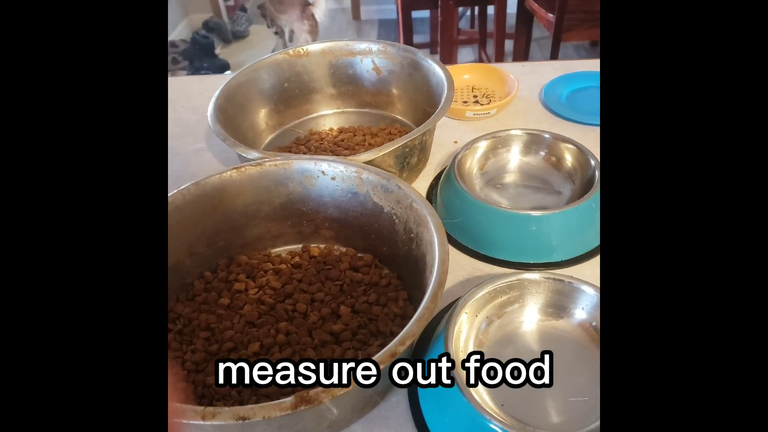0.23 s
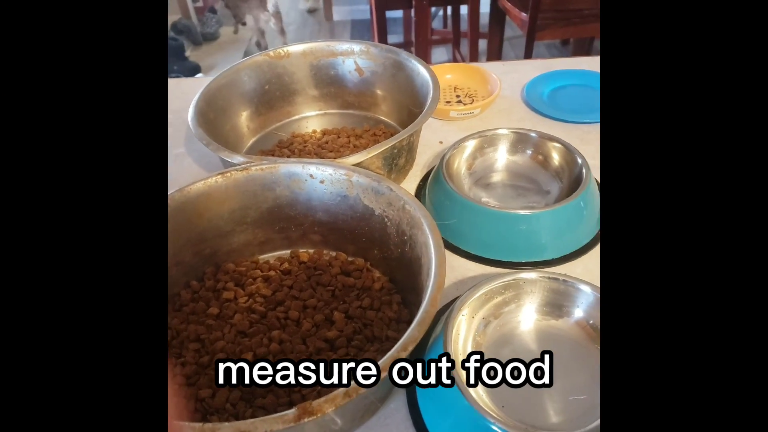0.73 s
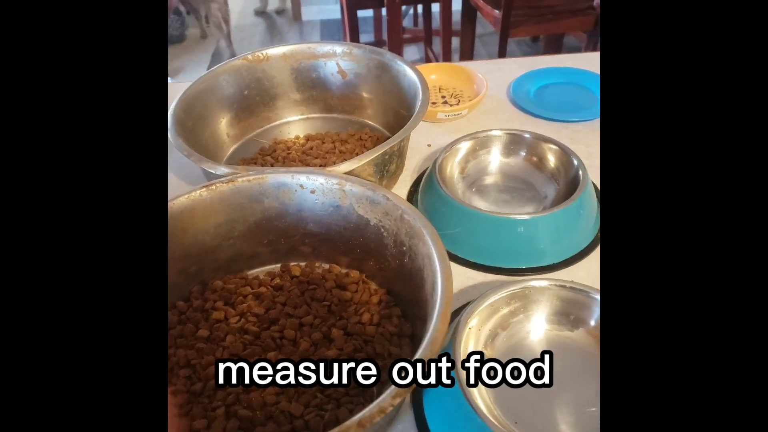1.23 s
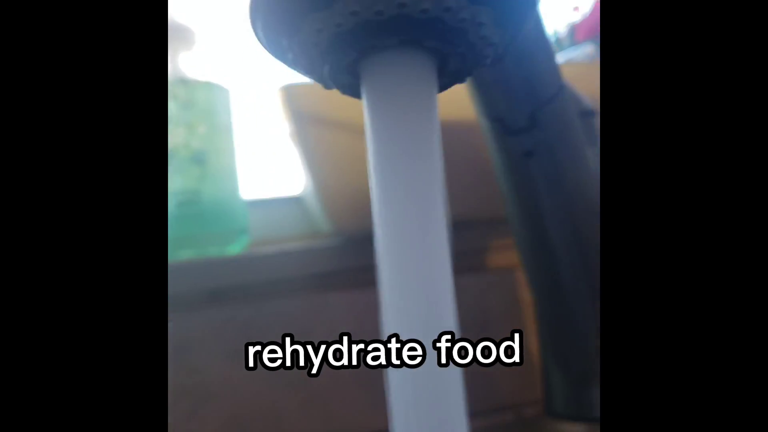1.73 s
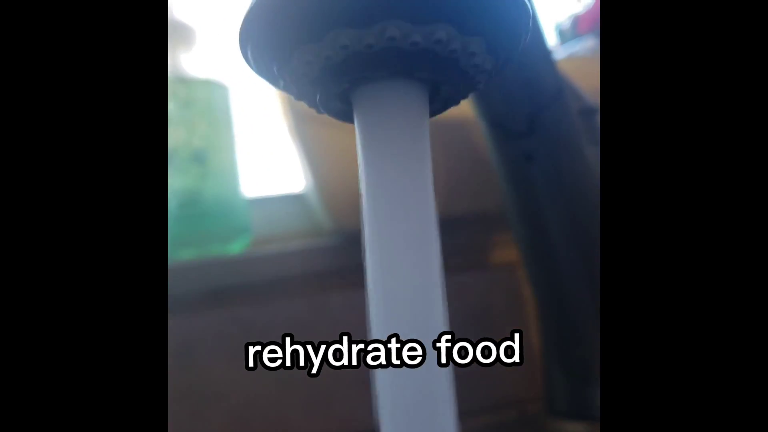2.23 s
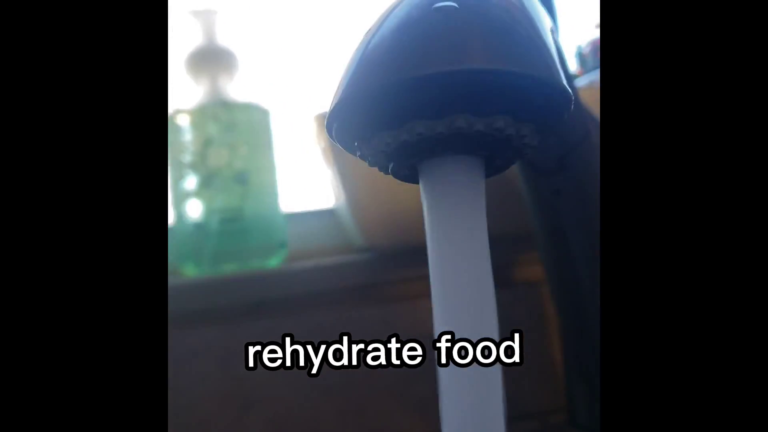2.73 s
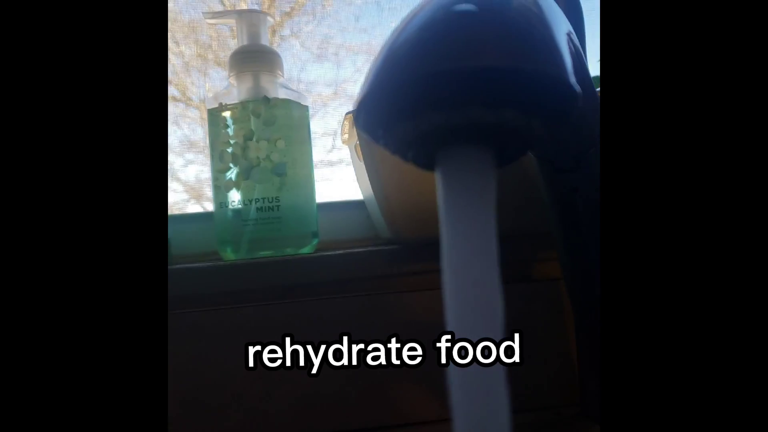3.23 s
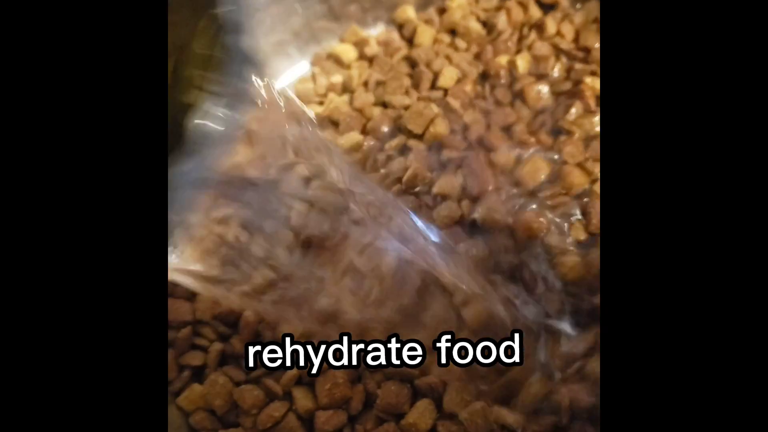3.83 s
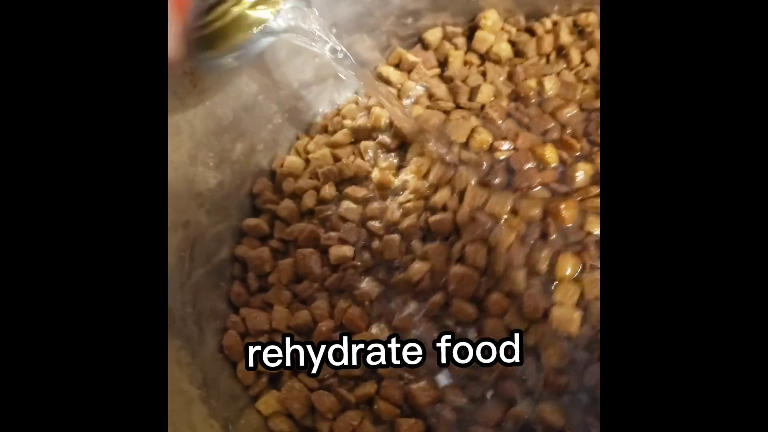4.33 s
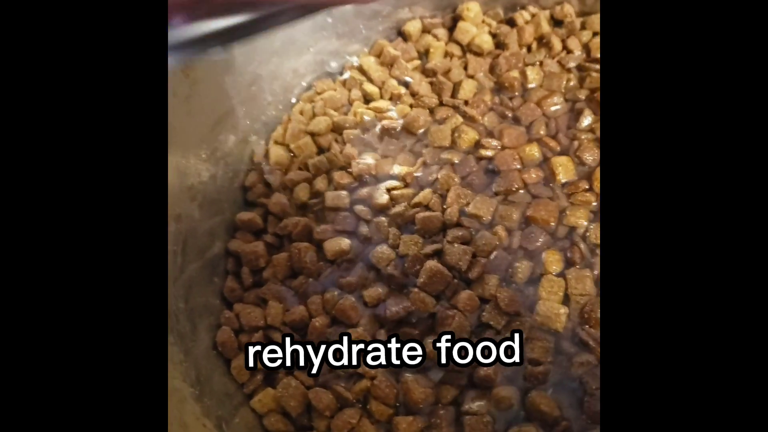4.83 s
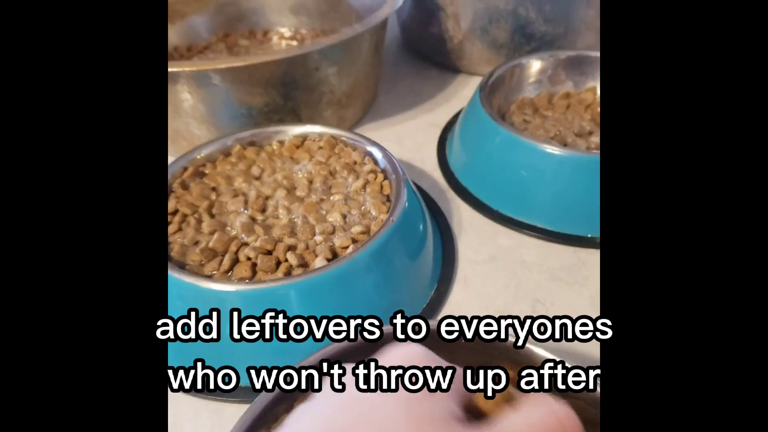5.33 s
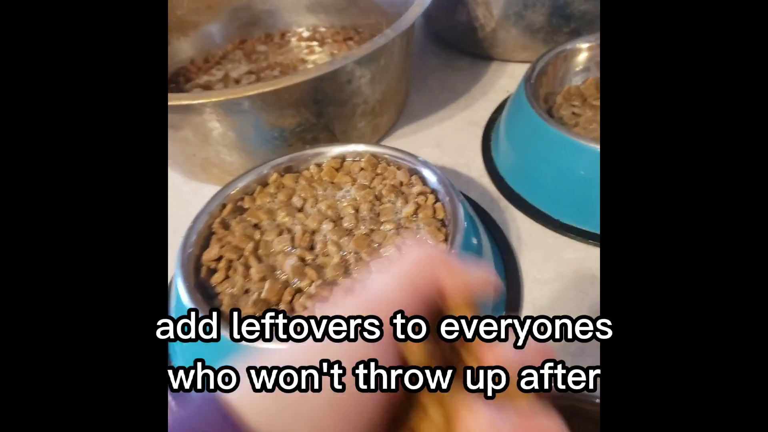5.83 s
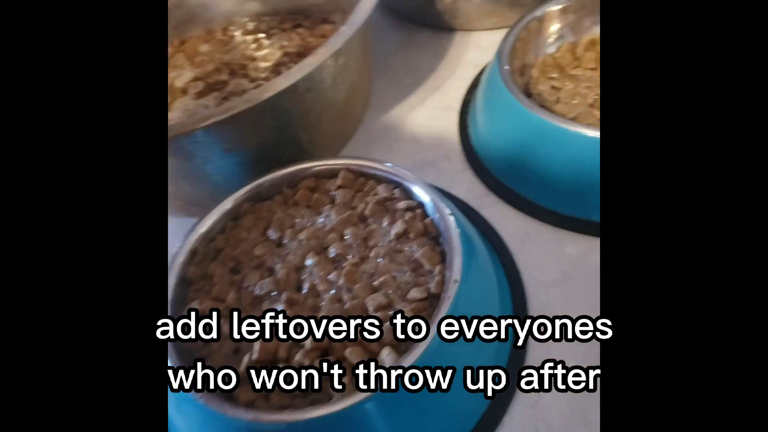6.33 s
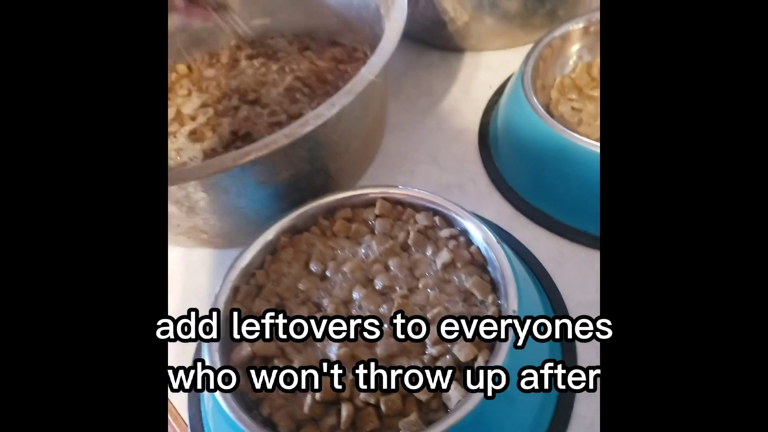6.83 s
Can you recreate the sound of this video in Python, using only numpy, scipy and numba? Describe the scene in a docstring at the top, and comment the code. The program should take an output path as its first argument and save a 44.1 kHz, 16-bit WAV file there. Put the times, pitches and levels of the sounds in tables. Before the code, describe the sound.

Dry kibble rustles, a kitchen tap thuds on and hisses, water splashes onto the food, then handfuls clatter into a steel bowl.

```python
"""A kitchen tap at feeding time, close up over humming motors, in four passages split by silence.
Dry kibble creeps in a steel pot. The tap opens: its pipe thuds, trapped air spits, and the aerated jet
hisses and drums into the sink. Water splashes onto the kibble in crackles and bubbles while the tap
runs on behind. Last, steel clinks on a rim, hard pieces drop into a bowl and a hand scoops the food."""
import sys
import numpy as np
from scipy import signal
from scipy.fft import rfft, irfft, next_fast_len
from scipy.io import wavfile
from numba import njit

SR = 44100
rng = np.random.default_rng(int(sys.argv[2]) if len(sys.argv) > 2 else 0)


def pcm_store(signal):
    """Save signal as 16-bit PCM."""
    levels = np.round(np.clip(np.atleast_2d(signal), -1, 1) * 32767)
    wavfile.write(sys.argv[1], SR, levels.astype(np.int16).T)


N = 313110

# the four audible passages: (start [s], end [s])
PASSAGES = [(0, 1.238), (1.366, 3.458), (3.580, 5.170), (5.276, 7.2)]
DRY_POT, TAP_ON, SOAKING, SERVING = PASSAGES
# stereo width, narrow in the bass and open on top: (frequency [Hz], side minus mid [dB])
STEREO_WIDTH = [(60, -24.5), (120, -20.5), (200, -15), (380, -6.5), (700, -3.5), (1300, -1.5), (2400, -0.5),
                (15000, 0)]


def undb(db):
    """Decibels to gain."""
    return np.exp(np.asarray(db) * (np.log(10) / 20))


def clock():
    """Time of every sample in seconds."""
    return np.arange(N) / SR


def swell(s, rise, hold, decay):
    """Envelope that grows to one at time s, holds and dies away; rise and decay are time constants."""
    t = clock()
    fade = np.maximum(s - t, 0) / rise + np.maximum(t - s - hold, 0) / decay
    return np.exp(-np.minimum(fade, 20))


def during(start, end, rise=0.00055, fall=0.0063):
    """Gate that ramps open from start and ramps shut from end."""
    return np.clip((clock() - start) / rise, 0, 1) * np.clip((end - clock()) / fall + 1, 0, 1)


def colour(x, points, share=1):
    """EQ through (Hz, dB) points; share scales the curve's dB."""
    hz, db = np.transpose(points)
    size = next_fast_len(x.shape[-1] + 2048, real=True)
    f = np.maximum(np.fft.rfftfreq(size, 1 / SR), 1)
    gain = undb(share * np.interp(np.log(f), np.log(hz), db))
    return irfft(rfft(x, size) * gain, size)[..., :x.shape[-1]]


def lean(x, points, left=0.57, right=0.46):
    """Pan by frequency: the left takes a share of an EQ curve, the right a share of its inverse."""
    return np.array([colour(x[0], points, left), colour(x[1], points, -right)])


def band(x, lo_hz, hi_hz):
    """Causal band-pass."""
    sos = signal.butter(2, [lo_hz, min(hi_hz, SR / 2 - 1)], "band", fs=SR, output="sos")
    return signal.sosfilt(sos, x)


def unit(x):
    """Scale a stereo sound so that its centre has rms 1."""
    return x / np.sqrt(np.mean(x.mean(0) ** 2))


def widen(pair):
    """Mid and side become left and right: alike in the bass, unlike in the treble."""
    return pair[0] + colour(pair[1], STEREO_WIDTH) * np.array([[1], [-1]])


def stereo_noise():
    """Broadband noise that widens towards the treble."""
    return widen(rng.standard_normal((2, N)))


def pan(db):
    """Channel gains that put the left db above the right."""
    return undb(np.array([[db], [-db]]) / 2)


def walk(rate):
    """Random drift with a spread near 1, turning rate times a second."""
    knots = np.arange(0, N / SR + 1, 1 / rate)
    return np.interp(clock(), knots, rng.standard_normal(len(knots)))


def add(out, s, sound):
    """Mix a short sound in at time s."""
    i = max(int(s * SR), 0)
    out[:, i:i + sound.shape[-1]] += sound[..., :max(N - i, 0)]


def ring(modes, t):
    """Decaying (Hz, dB, t60) modes of a struck object, slightly detuned at each blow."""
    return sum(undb(db - 60 * t / t60) * np.sin(2 * np.pi * hz * (1 + 0.0006 * rng.standard_normal()) * t)
               for hz, db, t60 in modes)


def burst(t, lo_hz, hi_hz, crack_s, tail_db, tail_s):
    """A contact crack and its diffuse tail, wider the higher it is; rms 1 over the first 20 ms."""
    mid, side = rng.standard_normal((2, len(t)))
    side_db = np.interp(np.sqrt(lo_hz * hi_hz), *np.transpose(STEREO_WIDTH))
    noise = mid + side * undb(side_db) * np.array([[1], [-1]])
    envelope = np.exp(-t / crack_s) + undb(tail_db) * np.exp(-t / tail_s)
    x = band(noise * envelope, lo_hz, hi_hz)
    return x / np.sqrt(np.mean(x.mean(0)[:SR // 50] ** 2))


@njit
def chirps(start, hz, cycles, size, glide):
    """Each grain is a damped sine that lasts some cycles and may glide upward."""
    y = np.zeros(N)
    for k in range(len(start)):
        length = int(cycles[k] * SR / hz[k]) + 2
        step = 2 * np.pi * hz[k] / SR
        phasor = size[k] + 0j
        turn = np.exp(1j * step - 5.8 / length)
        bend = np.exp(1j * step * glide / length)
        for i in range(min(length, N - start[k])):
            phasor *= turn
            turn *= bend
            y[start[k] + i] += phasor.imag
    return y


def grains(rate, lo_hz, hi_hz, cycles, spread_db, glide=0.0):
    """A shower of uneven grains, rate a second; each has its own stereo lag and balance."""
    when, pitch, life, size, lag, side = rng.random((int(rate * N / SR), 6)).T
    hz = lo_hz * (hi_hz / lo_hz) ** pitch
    size = undb(-spread_db * np.log(size * .99 + .01)) * np.sqrt(hz) * rng.choice([-1, 1], len(hz))
    channels = []
    for way, share in ((1, side), (-1, 1 - side)):
        start = np.clip(when * N + way * (lag - .5) * 20, 0, N - 1).astype(np.int64)
        channels.append(chirps(start, hz, cycles * (.5 + life), size * np.sqrt(share), glide))
    return np.array(channels)


def room(x, wet_db, t60):
    """Hard kitchen surfaces add a short diffuse tail."""
    t = np.arange(SR // 4) / SR
    tail = rng.standard_normal((2, len(t))) * undb(-60 * t / t60) * (t > .003)
    tail /= np.sqrt(np.sum(tail ** 2, axis=1, keepdims=True))
    return x + undb(wet_db) * signal.oaconvolve(x, tail, axes=1)[:, :N]


def motor(lines):
    """A motor's steady (Hz, dB) tones, each wavering in level."""
    t = clock()
    return sum(np.sqrt(2) * undb(db + 0.95 * walk(5.9)) * np.sin(2 * np.pi * (hz * t + rng.random()))
               for hz, db in lines)


def room_tone():
    """Appliance motors hum over dull air; a whine joins the first passage, a faint hiss the last."""
    # motor tones; the two lowest of the hum beat: (frequency [Hz], level [dB])
    hum_lines = [(59.6, -62.5), (66.1, -54.5), (119.8, -82.5), (139, -76.5)]
    whine_lines = [(188.4, -72), (285.3, -78), (376.8, -74)]
    # EQ of the kitchen air and of the high hiss: (frequency [Hz], gain [dB])
    air_eq = [(25, -6.5), (60, 6.5), (110, 0), (190, -9), (300, -13.5), (500, -24), (1000, -35.5),
              (2500, -39.5), (5000, -42), (6800, -42), (8200, -52.5), (9500, -52.5), (12000, -42.5),
              (15500, -43.5)]
    hiss_eq = [(1000, -34), (3000, -13), (5500, -11), (6800, 1), (8000, -37), (10500, -28), (12500, -8),
               (15300, 2.5)]
    hum = motor(hum_lines) * undb(3.9 * during(*DRY_POT) + 3.2 * during(*SOAKING))
    whine = motor(whine_lines) * during(*DRY_POT)
    air = unit(colour(stereo_noise(), air_eq)) * undb(-59.5 + walk(12))
    hiss = unit(colour(stereo_noise(), hiss_eq)) * undb(-69.5) * during(*SERVING)
    return hum + whine + air + hiss


def kibble_rustle():
    """Dry pieces creep against each other, now and then in a small slide."""
    # slides in the heap: (peak time [s], level [dB], rise [s], decay [s])
    slides = [(0.143, -69, .015, 0.094), (0.328, -74, 0.02, 0.028), (0.497, -54.5, 0.0084, 0.041),
              (0.616, -66.5, .0015, 0.047), (0.72, -70.5, 0.04, 0.048), (1.043, -62.5, 0.0047, 0.05),
              (5.286, -63, 0.0079, 0.11), (5.56, -68, 0.053, 0.032), (6.524, -69, 0.0018, 0.0079),
              (6.56, -67, .25, 0.4)]
    # EQ of the shifting kibble: (frequency [Hz], gain [dB])
    grit_eq = [(350, -41), (600, -26), (1110, -20), (1780, -24.5), (2900, -16), (4020, -17), (6500, -4.5),
               (8470, -10.5), (10500, -2.5), (14400, 0.5), (15400, 3)]
    creep = undb(-84.5) * during(*DRY_POT) + undb(-83.5) * during(*SERVING)
    sliding = sum(undb(db) * swell(s, rise, 0, decay) for s, db, rise, decay in slides)
    grit = room(grains(9000, 620, 16000, cycles=2.2, spread_db=4.0), wet_db=-1.8, t60=0.086)
    return unit(colour(grit, grit_eq)) * np.hypot(creep, sliding) * pan(5.1)


def pot_scuffs():
    """Pots and bowls scuff softly on the counter; the steel gives one tiny high tink."""
    # soft scrapes: (time [s], level [dB], rise [s], hold [s], decay [s], band centre [Hz])
    scuffs = [(0.275, -83, .03, 0.031, .04, 1500), (0.503, -74.5, 0.012, 0.047, .03, 1200),
              (0.75, -81.5, 0.026, 0.032, .03, 1400), (0.97, -74.5, .004, 0.015, 0.0054, 2100),
              (5.552, -69, 0.11, 0.039, 0.055, 1140), (6.526, -69.5, 0.1, 0.045, 0.024, 3920)]
    spread = 2.04  # band edge over band centre
    rub = stereo_noise() * undb(4.0 * walk(120))
    out = sum(unit(band(rub, hz / spread, hz * spread)) * undb(db) * swell(s, rise, hold, decay)
              for s, db, rise, hold, decay, hz in scuffs)
    t = np.arange(SR // 3) / SR
    tink = ring([(11670, -59, 0.18)], t) * (1 - np.exp(-t / .004))
    add(out, 0.143, tink)
    return out * pan(5.6)


def kibble_hits():
    """A falling piece knocks, cracks, snaps and ticks; a brighter hit has more tick and less knock."""
    # pieces striking bowl and heap: (time [s], level [dB], brightness [dB], snap centre [Hz])
    hits = [(0.477, -56, 14, 6000), (0.488, -44.5, 14, 6500), (1.06, -52, 11, 4800),
            (5.331, -38.5, 22, 6000), (5.83, -28, -8, 4870), (5.836, -34, 4, 3900), (5.89, -33.5, 23, 5500),
            (5.897, -38.5, -17, 3800), (5.944, -48.5, -18, 4760), (6.522, -45.5, 5, 5490),
            (6.601, -53, 3, 6500), (6.62, -35, 0.5, 5900), (6.624, -37, -3, 5600), (6.72, -41.5, -7, 3200),
            (6.738, -38, -9, 3400), (6.7424, -32.5, -6, 3260), (6.748, -32.5, 15, 5000),
            (6.778, -37, -8, 3220), (6.801, -41.5, -8, 4140), (6.866, -31, -2, 4800), (6.872, -24, 8, 6060),
            (6.888, -28.5, -4, 5600), (6.891, -27.5, -9, 5030), (6.903, -23.5, -2, 5200),
            (6.917, -26.5, 0, 4200), (6.934, -26.5, -2, 5400), (6.973, -28.5, -3, 2620),
            (6.981, -30.5, -5, 3930), (6.993, -34, 0, 2800), (7.0, -27, 1, 5500), (7.007, -34, -4, 3000),
            (7.022, -32, -4, 2700), (7.028, -24.5, 3, 5200), (7.037, -31, -2, 3200), (7.042, -27, 2, 4400),
            (7.057, -32, 3, 4600), (7.06, -32, 4, 5440), (7.064, -25, 3, 6000), (7.082, -26.5, -6, 2980),
            (7.097, -28, -5, 4200)]
    spread = 1.29  # band edge over band centre
    out, t = np.zeros((2, N)), np.arange(SR // 5) / SR
    for s, db, bright_db, hz in hits:
        knock = burst(t, 600, 2740, 0.002, -8, 0.04) * undb(-9.5 - bright_db)
        crack = burst(t, 2070, 7000, 0.0013, -20, 0.042) * undb(-2)
        snap = burst(t, hz / spread, hz * spread, 0.00083, -22.5, 0.038)
        tick = burst(t, 11100, 15600, 0.0013, -20, 0.012) * undb(-1.5 + bright_db)
        hit = knock + crack + snap + tick
        add(out, s, hit / np.abs(hit.mean(0)).max() * undb(db) * pan(5))
    return out


def jet(eq, echo_db):
    """The aerator breaks the stream into tiny bubbles: an even fizz, coloured by the sink's walls."""
    fizz = rng.standard_normal((2, N)) * undb(.3 * walk(90) + .15 * walk(9))
    return unit(colour(widen(room(fizz, echo_db, t60=0.034)), eq))


def tap():
    """The tap surges open close by, later runs behind the pot; its jet drums on the sink."""
    # EQ of the hiss and the drumming, close by and behind the pot: (frequency [Hz], gain [dB])
    near_hiss_eq = [(300, -56.5), (450, -26), (660, -24.5), (820, -25.5), (1100, -25.5), (1450, -19.5),
                    (1750, -18.5), (1980, -20), (2150, -13.5), (2380, -15.5), (2700, -12.5), (2950, -16),
                    (3400, -17.5), (4300, -14), (5100, -10), (6700, -9), (8200, -14.5), (10300, -8.5),
                    (11600, -2), (13300, -1.5), (15300, 0)]
    near_drum_eq = [(40, -22), (70, -2.5), (95, 4.5), (170, -5.5), (250, -2.5), (330, -9.5), (450, -19),
                    (800, -35.5)]
    far_hiss_eq = [(300, -63), (450, -16), (1100, -21), (2100, -16.5), (3100, -17.5), (4200, -10),
                   (6600, -9), (8000, -16.5), (9500, -10), (12000, 0.5), (13800, 2.5), (15300, -1)]
    far_drum_eq = [(50, 2.5), (90, -4.5), (140, -7.5), (190, -3.5), (235, 3.5), (290, -6), (350, -13.5),
                   (450, -13.5), (800, -32.5)]
    # stereo placement of the hiss behind the pot: (frequency [Hz], leftward lean [dB])
    far_lean = [(1000, 1), (5500, 1), (6800, 0), (7400, 5.5), (8200, -0.5), (12000, -3), (14000, -11),
                (15300, 0)]
    # brief swells of the drumming: (time [s], level [dB])
    drum_swells = [(2.546, -49), (2.96, -60), (3.082, -45), (3.584, -42), (3.85, -43.5), (4.4, -46),
                   (4.614, -51), (4.8, -51)]
    leaks_s, opens_s = 1.434, 1.479  # a faint fizz leaks through the valve before the water comes
    t = clock()
    near_gate = during(opens_s, TAP_ON[1], rise=0.025) + undb(-42.5) * during(leaks_s, opens_s)
    surge_db = 6 * np.exp(-np.maximum(t - opens_s, 0) / 0.13)  # stored pressure lets go
    ease_db = np.interp(t, (2.55, 2.7), (0, -2.5))
    flow = undb(surge_db + ease_db)
    drumming = stereo_noise() * undb(2 * walk(20))
    swells = sum(undb(db) * swell(s, rise=0.011, hold=0, decay=0.011) for s, db in drum_swells)
    near = jet(near_hiss_eq, echo_db=-13) * flow * undb(-22.5) * pan(0.74)
    near += unit(colour(drumming, near_drum_eq)) * (flow * undb(-49.5) + swells)
    far = lean(jet(far_hiss_eq, echo_db=-7), far_lean) * undb(-36.5)
    far += unit(colour(drumming, far_drum_eq)) * (undb(-53) + swells)
    # a faint, thin high tone sounds just before the water comes
    thin_tone_hz = 4510 + 15 * walk(250)
    thin_tone = np.sin(2 * np.pi * np.cumsum(thin_tone_hz) / SR) * undb(-64.5)
    thin_tone *= during(TAP_ON[0], opens_s, rise=0.022, fall=0.025)
    return near * near_gate + far * during(*SOAKING) + thin_tone


def pipe_knocks():
    """The pipe thumps as the water starts; the valve chatters ever more weakly, ringing hollow modes."""
    # thuds: (time [s], thump pitch [Hz], thump [dB], ring [dB], shudder length [s], clack re ring [dB])
    thuds = [(1.4318, 168, -13.5, -24.5, .07, -15.5), (1.494, 245, -23.5, -31, .03, -12),
             (1.504, 70.6, -27.5, -42, .01, -16.5), (1.555, 152, -27, -36, .01, -17.5),
             (1.718, 112, -25, -29.5, .01, -34), (1.806, 336, -35.5, -42, .01, -34),
             (1.812, 83.5, -33.5, -42, .01, -34)]
    # resonances of tap and pipe: (frequency [Hz], level [dB], t60 [s])
    pipe_modes = [(91.3, -1, 0.14), (164.4, -6.5, 0.22), (256, -5.5, 0.14), (323.4, -1, 0.066),
                  (447, -18.5, 0.079), (620, -18.5, 0.048), (930, -17, 0.063), (1090, -16.5, 0.048)]
    thump_cycles = 2.6
    rebound_s, rebound_step_db, rebound_clack_db = .0118, -2, -6  # a shudder is a train of rebounds
    out, t = np.zeros((2, N)), np.arange(SR // 4) / SR
    soft_contact = np.sin(np.pi / 2 * np.minimum(t / .005, 1)) ** 2
    for s, hz, thump_db, ring_db, shudder_s, clack_db in thuds:
        push = np.sin(np.pi * np.minimum(hz * t / thump_cycles, 1))
        add(out, s, push * np.sin(2 * np.pi * hz * t) * undb(thump_db))
        for k, delay in enumerate(np.arange(0, shudder_s, rebound_s)):
            clack = burst(t, 590, 1250, 0.0043, -10, 0.023)
            lever_rattle = burst(t, 1300, 2700, 0.0045, -16, .015) * undb(-11.5)
            clack_gain = undb(clack_db + rebound_clack_db * (k > 0)) * pan(2.2)
            blow = ring(pipe_modes, t) * soft_contact + (clack + lever_rattle) * clack_gain
            jitter_s = 0.00017 * rng.standard_normal()
            add(out, s + delay + jitter_s, blow * undb(ring_db + k * rebound_step_db))
    return out


def air_spits():
    """Air trapped in the pipe sputters out through the aerator."""
    # puffs of air: (peak time [s], level [dB], rise [s], decay [s])
    puffs = [(1.493, -40, 0.0026, 0.0061), (1.70, -37.5, 0.011, 0.01), (1.719, -22.5, 0.0054, 0.0063),
             (1.732, -41.5, .004, 0.014)]
    # EQ of the sputter: (frequency [Hz], gain [dB])
    sputter_eq = [(600, -49), (950, -29), (1250, -12.5), (1800, 3), (2050, -5.5), (2400, 0.5), (3300, -8.5),
                  (4500, -9), (7000, -35)]
    sputter = unit(colour(stereo_noise() * undb(2.7 * walk(400)), sputter_eq))
    envelope = sum(undb(db) * swell(s, rise, 0, decay) for s, db, rise, decay in puffs)
    return sputter * envelope * pan(1.8)


def flicker(x, depth_db, rate, bands=9):
    """Each band of a sound swells and fades on its own."""
    spectrum = rfft(x)
    log_hz = np.log(np.maximum(np.fft.rfftfreq(N, 1 / SR), 1))
    centres = np.log(np.geomspace(500, 9000, bands))
    return sum(irfft(spectrum * np.interp(log_hz, centres, row), N) * undb(depth_db * walk(rate))
               for row in np.eye(bands))


def pour():
    """Water splatters over the kibble in crackles and small bubbles, gushes once and thins out."""
    # EQ of the splash: (frequency [Hz], gain [dB])
    splash_eq = [(200, -14), (330, -15), (520, -12), (720, -9.5), (1000, -2.5), (1500, -3.5), (2100, -2),
                 (2500, -0.5), (3000, 1.5), (5500, 0), (6600, 4), (8000, -16.5), (11000, -7), (15000, -29)]
    gush_s, thins_s, ends_s = 3.825, 4.217, 4.53
    t = clock()
    splatter = unit(grains(7000, 505, 13000, cycles=1.7, spread_db=1.3))
    bubbles = unit(grains(1600, 558, 5020, cycles=32, spread_db=4.0, glide=0.11))
    splash = room(splatter + undb(-7.5) * bubbles, wet_db=-8.5, t60=0.12)
    splash = flicker(unit(colour(splash, splash_eq)), depth_db=2.5, rate=70)
    stream_db = np.where(t < 3.7, -44, -43) + 0.5 * walk(30)
    gush_db = 7.5 * swell(gush_s, rise=0.027, hold=0, decay=0.027)
    thinning_db = -42 * np.maximum(t - thins_s, 0)
    flow = undb(stream_db + gush_db + thinning_db) * during(SOAKING[0], ends_s, fall=0.049)
    return splash * flow * pan(6.3)


def gurgles():
    """Air pockets in the heap and the sink ring with a rising pitch; big bubbles ring longer."""
    # bubbles: (time [s], starting pitch [Hz], level [dB])
    bubbles = [(3.60, 624, -40), (3.735, 786, -41), (3.77, 810, -43), (3.795, 891, -32.5),
               (3.811, 922, -33), (3.818, 1082, -44), (3.825, 800, -45), (3.838, 1030, -41),
               (3.85, 715, -37), (3.868, 1010, -36.5), (3.872, 704, -41), (4.39, 230, -40),
               (4.604, 236, -41), (4.78, 227, -38.5)]
    out, t = np.zeros((2, N)), np.arange(SR // 5) / SR
    for s, hz, db in bubbles:
        t60 = 3.35 / np.sqrt(hz)
        envelope = undb(db - 60 * t / t60) * (1 - np.exp(-t / 0.0014))
        add(out, s, envelope * np.sin(2 * np.pi * hz * t * (1 + 0.77 * t)) * pan(3.5))
    return out


def drop_slaps():
    """Single drops land on the kibble with a sharp crack and a hollow plop."""
    # drops: (time [s], level [dB], plop re crack [dB], crack centre [Hz])
    drops = [(3.584, -31, 1, 2700), (3.707, -26, -8, 3600), (3.7267, -20, -16, 2700),
             (3.816, -33, -11, 3300), (3.831, -29, -14, 4000), (3.949, -31, -18, 2200),
             (4.042, -28, -14, 3740), (4.078, -30, -22, 6000), (4.131, -28.5, -10, 2300),
             (4.154, -23.5, -19, 3700), (4.16, -38, -18, 5000), (4.229, -35, -3, 1500),
             (4.2477, -23, -22, 4300), (4.323, -27, -18, 5200), (4.421, -30.5, -9, 4000),
             (4.476, -37.5, 2, 1500), (4.51, -39.5, 7, 1500), (4.524, -36.5, 6, 1300)]
    spread = 1.62  # band edge over band centre
    out, t = np.zeros((2, N)), np.arange(SR // 5) / SR
    for s, db, plop_db, hz in drops:
        crack = burst(t, hz / spread, hz * spread, .0013, -18, 0.0094)
        plop = burst(t, 360, 1120, 0.0034, -11, 0.013) * undb(plop_db)
        slap = crack + plop
        add(out, s, slap / np.abs(slap.mean(0)).max() * undb(db) * pan(3.2))
    return out


def bowls():
    """The bowls thump dully on the counter, and their walls ping where the bare steel is hit."""
    # nudges on the counter: (time [s], pitch [Hz], level [dB])
    bumps = [(5.53, 233, -46), (5.535, 140, -42), (5.559, 166, -45), (5.83, 422, -44.5),
             (6.746, 252, -46.5), (6.778, 485, -53.5), (6.886, 290, -48), (6.995, 202, -40.5),
             (6.99, 140, -45), (7.04, 139, -46)]
    # wall hits; the spot decides which modes speak: (time [s], level [dB], favoured frequency [Hz])
    wall_hits = [(5.663, -50, 900), (5.83, -38, 2160), (5.897, -46, 1950), (6.62, -51.5, 1530),
                 (6.778, -42.5, 3150), (6.973, -45, 1900), (7.022, -38, 2600), (7.083, -42, 2900)]
    # resonances of the wall: (frequency [Hz], level [dB], t60 [s])
    wall_modes = [(905, -6, 0.076), (980, -7, 0.046), (1560, -8, 0.19), (1575, -3, 0.05), (1810, -9, 0.057),
                  (2120, -1, 0.039), (2620, -14, .08), (3060, -4, 0.052), (3340, 1, 0.04), (3695, -14, .12),
                  (4400, -12, 0.07), (5000, -5, 0.092), (6400, -4, 0.1)]
    falloff_db_per_octave = 33
    out, t = np.zeros((2, N)), np.arange(SR // 3) / SR
    for s, hz, db in bumps:
        add(out, s, ring([(hz, db, .085)], t) * (1 - np.exp(-t / 0.0017)) * pan(0.91))
    for s, db, favoured_hz in wall_hits:
        modes = [(hz, mode_db - falloff_db_per_octave * abs(np.log2(hz / favoured_hz)), t60)
                 for hz, mode_db, t60 in wall_modes]
        add(out, s, ring(modes, t) * undb(db) * pan(7.8))
    return out


def rim_clinks():
    """Steel meets steel: a bright scrape of contact and a short jangle, then the rim's close modes beat."""
    # touches on the rim: (time [s], ring [dB], contact [dB], jangle [dB], jangle centre [Hz])
    touches = [(5.663, -32, -37.5, -43, 6900), (5.670, -38, -46, -52, 6750), (6.864, -54, -68, -49, 6300),
               (6.871, -53, -50, -43.5, 6260)]
    # resonances of the rim: (frequency [Hz], level [dB], t60 [s])
    rim_modes = [(6560, -21.5, 0.17), (6800, -12, 0.15), (6918, -13, 0.18), (7097, -0.5, 0.16),
                 (7040, -18, .06), (7270, -20, .08), (7560, -20, .14), (8786, -26, 0.17), (9680, -14, 0.15),
                 (11000, -26, .15), (11660, -27, .22), (13530, -32, 0.21)]
    spread = 1.06  # band edge over band centre
    out, t = np.zeros((2, N)), np.arange(SR // 2) / SR
    attack = 1 - np.exp(-t / 0.00048)
    for s, ring_db, contact_db, jangle_db, hz in touches:
        add(out, s, ring(rim_modes, t) * undb(ring_db) * pan(11))
        scrape = burst(t, 7600, 13400, 0.0014, -21, 0.033)
        body = burst(t, 650, 2700, 0.0021, -11, 0.031) * undb(-18)
        jangle = burst(t, hz / spread, hz * spread, 0.0061, -8, 0.014) * undb(jangle_db) * pan(9.4)
        add(out, s, ((scrape + body) * undb(contact_db) + jangle) * attack)
    return room(out, wet_db=-12, t60=0.25)


def scoop():
    """Handfuls scatter and fingers plough the heap: hard pieces clatter, the pot rumbles under them."""
    # handfuls dropped, stirred or dug out: (time [s], level [dB], hold [s], decay [s])
    handfuls = [(5.831, -57.5, 0.046, 0.067), (6.732, -58.5, 0.075, .03), (6.865, -48.5, 0.074, 0.06),
                (6.975, -51, 0.14, .02), (7.006, -50.5, .05, .02)]
    # EQ of the clattering heap: (frequency [Hz], gain [dB])
    heap_eq = [(59, -47), (100, -30), (140, 8.5), (173, -16), (209, -7), (340, -14.5), (563, -17.5),
               (1250, -18.5), (1850, -9.5), (2850, -4), (5000, -4), (6700, -6.5), (8600, -20),
               (12000, -0.5), (15400, -14)]
    clatter = unit(grains(4500, 454, 19800, cycles=7.6, spread_db=2.5))
    rumble = unit(band(stereo_noise(), 160, 490))
    heap = room(clatter * pan(4) + undb(-5) * rumble, wet_db=-10.5, t60=0.25)
    effort = sum(undb(db) * swell(s, 0.0029, hold, decay) for s, db, hold, decay in handfuls)
    return unit(colour(heap, heap_eq)) * effort


def scene():
    """The full mix, gated into four passages with silence between them."""
    gate = sum(during(start, end) for start, end in PASSAGES)
    mix = room_tone() + tap() + pipe_knocks() + air_spits() + pot_scuffs()
    mix += pour() + gurgles() + drop_slaps()
    mix += kibble_rustle() + scoop() + kibble_hits() + bowls() + rim_clinks()
    return gate * mix


def record(dry):
    """Each microphone port adds its own colour; the deep bass and the very top are cut."""
    # unequal resonances of the two ports: (frequency [Hz], leftward lean [dB])
    port_lean = [(60, 1.5), (600, 1.5), (1300, 2.5), (2400, -2.5), (4000, 0), (5400, -1), (6800, 7.5),
                 (7500, 8.5), (8400, -4), (12200, 0), (13200, 3.5), (14400, 9), (15300, 11.5)]
    low_cut = signal.butter(2, 36, "high", fs=SR, output="sos")
    high_cut = signal.ellip(12, .2, 80, 15450, fs=SR, output="sos")
    heard = lean(dry, port_lean, left=0.44, right=0.65)
    return signal.sosfilt(high_cut, signal.sosfilt(low_cut, heard))


dry = scene()
out = record(dry)
pcm_store(out)
```